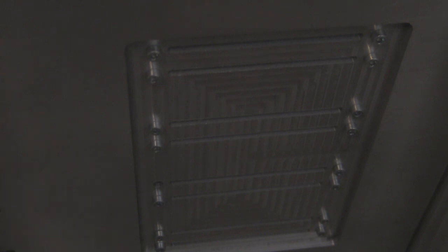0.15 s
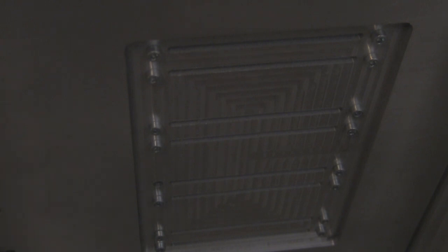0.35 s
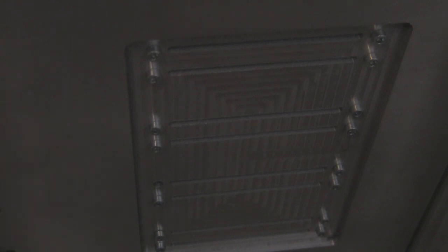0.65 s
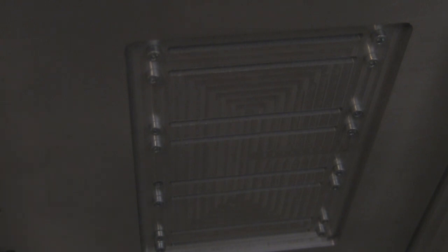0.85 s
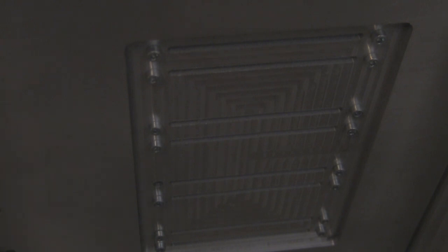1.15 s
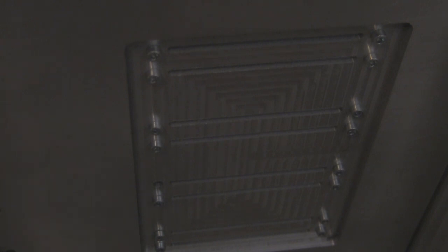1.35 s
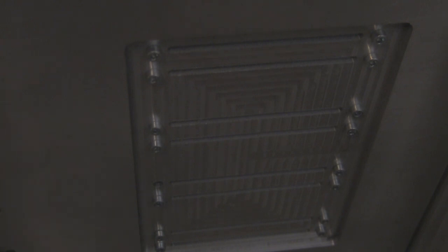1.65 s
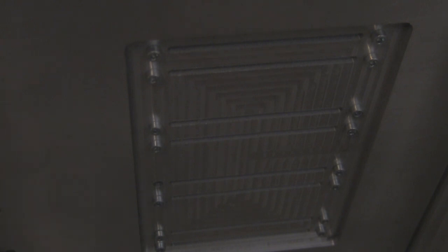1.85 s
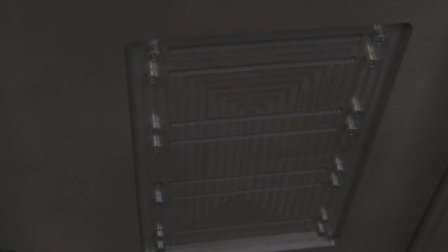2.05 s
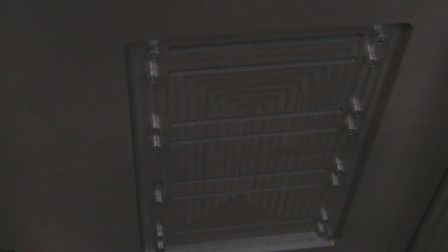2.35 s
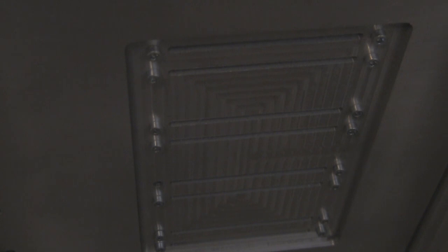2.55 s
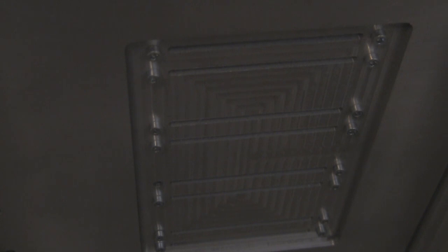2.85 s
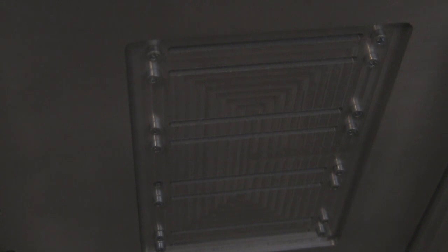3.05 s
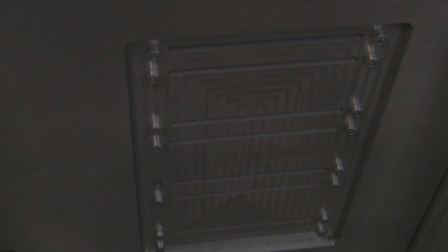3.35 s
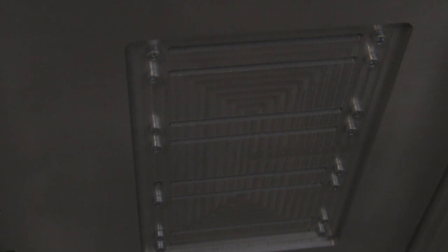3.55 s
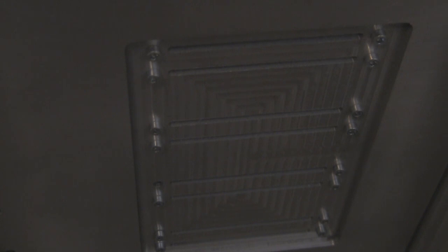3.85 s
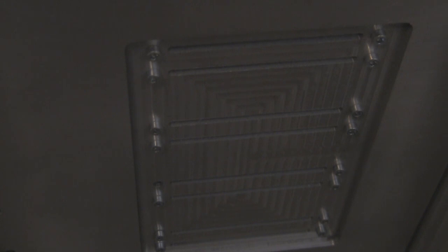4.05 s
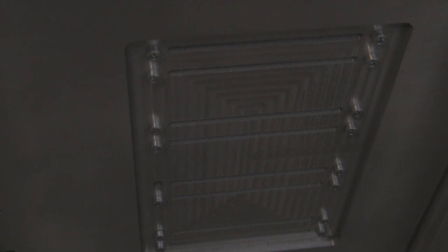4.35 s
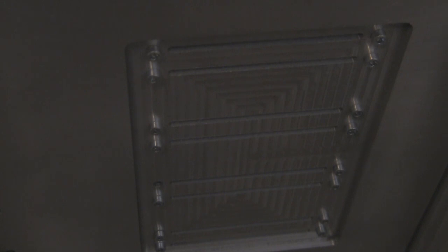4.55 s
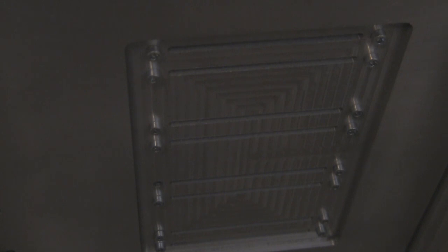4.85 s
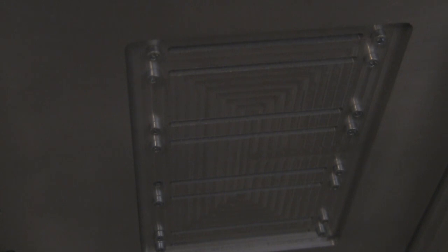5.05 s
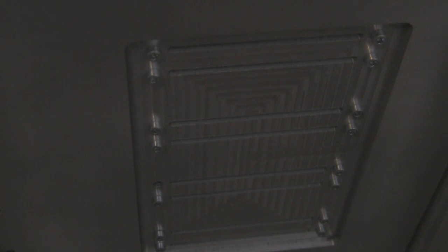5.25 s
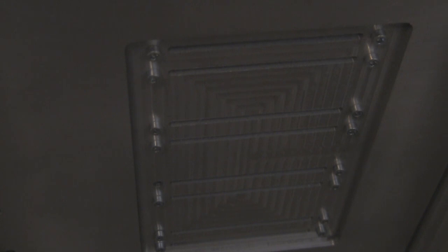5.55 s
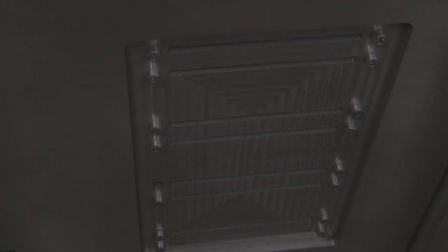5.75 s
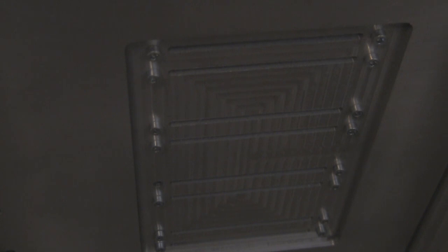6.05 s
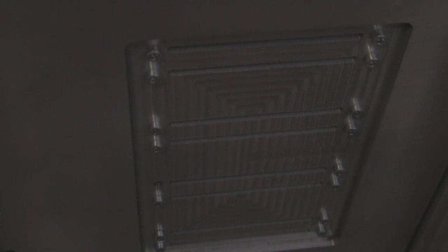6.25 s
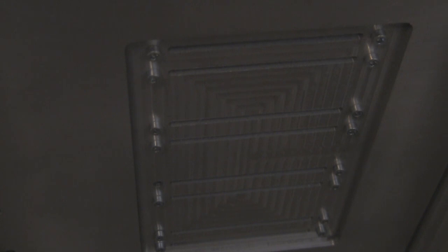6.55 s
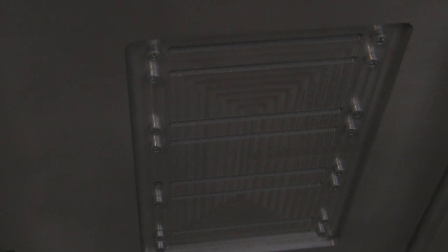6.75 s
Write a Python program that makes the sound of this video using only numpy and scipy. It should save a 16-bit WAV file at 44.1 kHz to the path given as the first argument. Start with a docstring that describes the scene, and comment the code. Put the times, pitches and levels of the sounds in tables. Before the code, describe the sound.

A metal case full of hard drives gives a steady low hum and airy whoosh, heard near in stereo with a short room echo. Desk knocks come first, then only whirring. Crisp little mouse clicks begin, followed by isolated drive croaks, which turn into fast, irregular, loud crunching and buzzing seeks, lasting until the cut.

```python
"""Hard drives and a fan hum and rush steadily in a metal case: wavering sine tones and shaped noise.
Early on come three knocks on the desk, noise through broad resonances, and two low thuds, fading sines.
Then a mouse button is pressed and released now and then: fine grit through the modes of its switch.
Soon after, drive arms make a few lone seeks, then chatter with only tiny pauses: driven body modes,
kicks, coil buzz and cover rasp. A small room answers the mouse and the drives."""
import sys
import numpy as np
from scipy import signal
from scipy.fft import rfft, irfft
from scipy.io import wavfile
from scipy.ndimage import uniform_filter1d, map_coordinates

SR = 44100
rng = np.random.default_rng(int(sys.argv[2]) if len(sys.argv) > 2 else 0)


def generate_wav(signal):
    """Clip the signal to [-1, 1] and save it as 16-bit WAV at the path in sys.argv[1]."""
    frames = np.transpose(np.atleast_2d(signal))
    scaled = np.clip(frames, -1, 1) * 32767
    pcm = np.round(scaled).astype(np.int16)
    wavfile.write(sys.argv[1], SR, pcm)


N = 305172

# All pans are left minus right, in dB.
# Fan and platter tones at multiples of the turning rate: (multiple, rms level [dB])
FAN_HZ, PLATTER_HZ = 52.66, 119.8
FAN_ORDERS = [(4, -43.5), (5, -46), (6, -66), (7, -55), (10, -53.5), (16, -70), (18, -58)]
PLATTER_ORDERS = [(1, -53), (6, -65.5), (19, -62)]
# Thin whines that fade: (pitch [Hz], rms level at the start [dB], fade [dB per s])
FADING_WHINES = [(1443, -54, 2.8), (9868, -69, 2.5), (3435, -67, 0.1)]
HUM_PAN_DB, PLATTER_EXTRA_PAN_DB = -1.3, 3

# Colour of the air rush: (frequency [Hz], relative level [dB])
AIR_SPECTRUM = [(15, -52), (25, -17), (158, -14.5), (213, -7), (278, -9), (318, -9.5), (515, -9),
                (673, -14), (1030, -10.5), (2240, -23), (2560, -22), (3440, -21.5), (6040, -29),
                (9520, -29.5), (15000, -46)]
# Case resonances heard in the rush: (frequency [Hz], width [Hz], lift [dB])
CASE_LIFTS = [(71.5, 12, 7.5), (173.4, 7.1, 12), (475, 26, 8), (836, 49, 8.5), (1034, 58, 6.5),
              (1651, 124, 9), (2164, 255, 10), (3462, 57, 10), (4380, 620, 5), (9440, 200, 3)]
# How alike left and right are in the rush: (frequency [Hz], likeness [0 to 1])
AIR_LIKENESS = [(40, 0.31), (120, 0.96), (250, 0.22), (500, 0.29), (1600, 0.72), (5000, 0.63), (9000, 0.49),
                (14000, 0.072)]
AIR_RMS_DB, AIR_PAN_DB = -39.5, -0.5

# Knocks on the desk:
# (time [s], strength [dB], rise [ms], strongest pitch [Hz], fall about it [dB per octave squared])
DESK_KNOCKS = [(0.2671, -25.5, 1.7, 2480, 1.5), (.639, -13, 14.6, 1500, -0.16), (0.751, -16, 3.9, 1110, 8)]
# Modes of desk and clutter: (frequency [Hz], width [Hz], level [dB], basic 60 dB fall time [s])
DESK_MODES = [(263, 39, -3, 0.27), (403, 164, -2, 0.28), (634, 400, -17, 0.68), (1075, 250, 1, 0.19),
              (1480, 160, -3.5, 0.19), (2080, 720, -4.5, 0.27), (2500, 790, 3.5, 0.11),
              (3520, 1000, -7, 0.3), (5470, 2000, -14.5, 0.33), (7300, 1700, -7.5, 0.19),
              (10500, 1100, -15.5, 0.16)]
# Low thuds through desk and floor: (time [s], peak level [dB], pitch [Hz], 60 dB fall time [s])
LOW_THUDS = [(0.656, -33.5, 66.7, 0.49), (2.05, -44, 70, 0.8)]

# Mouse button: (press time [s], time held [ms], press strength [dB])
MOUSE_CLICKS = [(2.7013, 101.7, -36.5), (2.958, 65, -35.5), (3.707, 98, -36.5), (4.7985, 64.8, -35.5),
                (5.4515, 68.9, -36.5), (5.7024, 58, -36.5), (6.0865, 75.4, -36.5), (6.564, 74, -35.5)]
# Switch modes: (frequency [Hz], width [Hz], level on press [dB], level on release [dB])
SWITCH_MODES = [(5560, 1250, 1.5, -11), (6260, 920, 3, -28), (7040, 660, 4.5, 3.5), (8700, 900, 5, -6),
                (9200, 420, -8.5, -23.5), (10400, 470, -15, -26)]
RELEASE_EXTRA_DB = 8
CLICK_AND_ARM_PAN_DB = 0.7

ROOM_T60_S, ROOM_DB, WALL_CUT_HZ, ROOM_PAN_DB = 0.23, -0.5, 8200, -1.2
BODY_TO_ROOM = 0.15  # the heavy case radiates its low modes little into the room

# Lone seeks and the loud ones of the chatter: (time [s], strength [dB], arm travel [ms])
LOUD_SEEKS = [(3.299, -25, 13), (3.351, -26, 10.8), (3.651, -23.5, 8.8), (4.34, -28.5, 14),
              (4.361, -24.5, 15), (4.422, -28.5, 7.2), (4.453, -27.5, 11), (4.47, -28, 7.1),
              (4.51, -25, 7.9), (4.53, -30, 18), (4.571, -34, 22), (4.653, -28, 6.4), (4.697, -27, 11.4),
              (4.894, -34, 14), (4.966, -25.5, 11.6), (5.011, -26.5, 14), (5.064, -21, 14.3),
              (5.19, -20, 15.5), (5.231, -25.5, 13), (5.272, -26, 7.6), (5.319, -29, 10.4),
              (5.384, -21.5, 15), (5.487, -22, 43), (5.627, -25, 29), (5.663, -24, 17), (5.683, -21.5, 20),
              (5.708, -23, 21), (5.797, -29, 8.8), (5.901, -24, 15), (5.921, -20, 11.2),
              (5.973, -20.5, 4.2), (6.038, -24, 10), (6.083, -30, 26), (6.131, -23.5, 12.4),
              (6.225, -21.5, 23.5), (6.253, -24, 20), (6.272, -28, 16), (6.356, -22.5, 7.9),
              (6.43, -32, 9.7), (6.452, -21, 10.3), (6.497, -24.5, 35), (6.54, -22.5, 11), (6.618, -32, 17),
              (6.639, -19.5, 9.5), (6.663, -22, 11.7), (6.728, -23, 13.6), (6.794, -23, 13),
              (6.845, -19, 10)]
# How hard seeks drive the low body modes, against their strength: (time [s], level [dB])
LOW_MODE_DRIVE = [(3.3, 1), (3.65, -3), (4.53, -3), (4.75, -7), (5.1, -19), (6.3, -14), (6.55, -14),
                  (6.9, -19)]
# Runs of small seeks: (start [s], end [s], strength [dB])
SMALL_SEEK_RUNS = [(4.33, 4.487, -42.5), (4.496, 4.934, -30.5), (5, 5.124, -29.5), (5.183, 5.844, -31),
                   (5.889, 6.406, -30.5), (6.461, 6.92, -30.5)]
# Drive body modes shaken by the arm: (frequency [Hz], width [Hz], relative level [dB])
BODY_MODES = [(157.8, 66.6, -12.5), (433.7, 59.3, -13), (493.3, 35.4, -9.5), (531.4, 28.35, -3),
              (661, 26.84, 0.5), (707, 48.6, -5), (798, 100, -11), (898, 63, -11.5), (1185, 51.9, -13.5),
              (1367, 21.2, -15.5), (1722, 195, -24.5)]
# Modes of the arm, rung by the coil buzz: (frequency [Hz], width [Hz], relative level [dB])
ARM_MODES = [(2280, 31, 1.5), (3450, 160, -5), (4200, 37, -17), (4167, 96, 2.5), (4645, 354, -5.5),
             (5110, 94, -11)]
# Modes of the cover, which rasps: (frequency [Hz], width [Hz], relative level [dB])
COVER_MODES = [(9400, 560, -3), (10140, 720, 0.5), (10800, 920, -2.5)]
SEEK_RISE_S, LOW_SCATTER_DB, SEEK_PAN_DB = 0.0054, 1.5, -2.2
SMALL_SEEKS_PER_S, RUN_RISE_S, RUN_T60_S = 260, 0.03, 0.26
BUZZ_DB, BUZZ_SCATTER_DB = -16.5, 3  # coil buzz against the seek's strength, and its chance spread
BUZZ_FOLLOWS_LOW = 0.47  # hard-driven seeks also buzz more [dB per dB]
REVERSE_RASP_DB = -29.5  # rasp as the arm reverses, against the drive of the low modes

TOP_CUT_HZ = 15100


def from_db(db):
    """Turn decibels into gain."""
    return 10 ** (np.asarray(db) / 20)


def rms_one(x):
    """Scale to an rms of 1."""
    return x / np.sqrt(np.mean(x ** 2) + 1e-20)


def at_hz(points, hz):
    """Read a curve of (Hz, value) points on a log-frequency axis."""
    point_hz, values = np.transpose(points)
    return np.interp(np.log(hz), np.log(point_hz), values)


def drift(rate):
    """Slow random wander around 0: `rate` random points a second, joined smoothly."""
    points = rng.standard_normal(600)
    coarse = np.arange(0, N + 32, 32)  # every 32nd sample is enough
    wander = map_coordinates(points, [5 + coarse / SR * rate], order=3)
    return np.interp(np.arange(N), coarse, wander)


def resonate(x, hz, width_hz):
    """A two-pole resonance that rings at one pitch, with gain 1 at its peak."""
    r = np.exp(-np.pi * width_hz / SR)
    w = 2 * np.pi * hz / SR
    gain = (1 - r * r) / 2
    return signal.lfilter([gain, 0, -gain], [1, -2 * r * np.cos(w), r * r], x + 1e-18)


def modes(x, table, skirt):
    """Side-by-side (Hz, width, dB) resonances, each followed by a wider one that steepens its flanks."""
    return sum(from_db(db) * resonate(resonate(x, hz, width), hz, skirt * width)
               for hz, width, db in table)


def swell(start_s, rise_s, hold_s, t60):
    """Loudness shape of one event: straight rise, hold, exponential fall; returns its slice and shape."""
    first = round(start_s * SR)
    length = min(N - first, round((rise_s + hold_s + t60) * SR))
    t = np.arange(length) / SR
    fall_db = -60 * np.maximum(t - rise_s - hold_s, 0) / t60
    return slice(first, first + length), np.minimum(t / rise_s, 1) * from_db(fall_db)


def pan(x, left_db):
    """Place a sound between the sides; left_db is left minus right."""
    return x * from_db([[left_db / 2], [-left_db / 2]])


def tone(hz, level_db, waver_db):
    """A sine whose level wavers slowly and whose phase differs a little between the sides."""
    phase = 2 * np.pi * (hz * np.arange(1, N + 1) / SR + rng.random())
    peak = np.sqrt(2) * from_db(level_db + waver_db * drift(5.5))
    return peak * np.sin(phase + [[0.2], [-0.2]])


def hum():
    """Turning fan and platters sound at multiples of their turning rates; thin whines fade on top."""
    fan = sum(tone(k * FAN_HZ, db, waver_db=0.4) for k, db in FAN_ORDERS)
    platters = sum(tone(k * PLATTER_HZ, db, waver_db=0.5) for k, db in PLATTER_ORDERS)
    t = np.arange(N) / SR
    whines = sum(tone(hz, db - fade_db * t, waver_db=3.0) for hz, db, fade_db in FADING_WHINES)
    return fan + pan(platters, PLATTER_EXTRA_PAN_DB) + whines


def air():
    """Fan and platters stir the air into a stereo rush of noise, lifted at the case resonances."""
    hz = np.maximum(np.fft.rfftfreq(N, 1 / SR), 1)
    lift_db = sum(db / (1 + (2 * (hz - f) / width) ** 2) for f, width, db in CASE_LIFTS)
    colour = from_db(at_hz(AIR_SPECTRUM, hz) + lift_db)
    mid, side = rfft(rng.standard_normal((2, N))) * colour
    alike = np.clip(at_hz(AIR_LIKENESS, hz), 0, 1)
    rush = irfft(np.sqrt(1 + alike) * mid + np.sqrt(1 - alike) * side * [[1], [-1]], N)
    return pan(from_db(AIR_RMS_DB + 0.5 * drift(9)) * rms_one(rush), AIR_PAN_DB)


def knocks():
    """Each knock shakes desk and clutter: noise in broad resonances, each dying at its own rate."""
    out = np.zeros((2, N))
    for hz, width, mode_db, t60 in DESK_MODES:
        common, own = rng.standard_normal((2, SR))
        noise = common + 0.15 * own * [[1], [-1]]
        rattle = rms_one(modes(noise, [(hz, width, 0)], skirt=5.2))
        for s, db, rise_ms, top_hz, fall_db in DESK_KNOCKS:
            knock_t60 = t60 * from_db(0.59 * (db + 17.5))  # light knocks die sooner
            at, shape = swell(s, rise_ms / 1000, 0, knock_t60)
            colour_db = mode_db - fall_db * np.log2(hz / top_hz) ** 2
            out[:, at] += from_db(db + colour_db - 10) * shape * rattle[:, :len(shape)]
    return out


def thuds():
    """A low mode swells and dies."""
    out = np.zeros(N)
    for s, db, hz, t60 in LOW_THUDS:
        at, shape = swell(s, 0.025, 0, t60)
        t = np.arange(len(shape)) / SR
        out[at] += from_db(db) * shape * np.sin(2 * np.pi * hz * t)
    return out


def mouse():
    """The switch snaps in some ms of fine clicks; press and release weight its modes differently."""
    out, grit = np.zeros(N), rng.standard_normal(N)
    snap = np.hanning(round(0.024 * SR))
    presses = [(s, db) for s, held_ms, db in MOUSE_CLICKS]
    releases = [(s + held_ms / 1000, db + RELEASE_EXTRA_DB) for s, held_ms, db in MOUSE_CLICKS]
    for column, snaps in enumerate((presses, releases)):
        force = np.zeros(N)
        for s, db in snaps:
            first = round((s - 0.007) * SR)
            force[first:first + len(snap)] += from_db(db) * snap
            at, shape = swell(s, 0.027, 0, 0.15)  # the shell buzzes on faintly
            force[at] += from_db(db - 22) * shape
        table = [(hz, width, levels[column]) for hz, width, *levels in SWITCH_MODES]
        out += modes(force * grit, table, skirt=1.45)
    return out


def room(x):
    """Walls send back dull, dying reflections, mostly shared by the two sides."""
    t = np.arange(SR // 2) / SR
    fading = from_db(-60 * t / ROOM_T60_S) * (t > 0.004)  # nothing returns in the first 4 ms
    common, own = rng.standard_normal((2, len(t))) * fading
    dull = signal.butter(1, WALL_CUT_HZ, fs=SR, output="sos")
    tail = signal.sosfilt(dull, common + 0.48 * own * [[1], [-1]])
    tail = tail / np.sqrt(np.sum(tail ** 2, axis=1)[:, None])
    return from_db(ROOM_DB) * signal.fftconvolve(x[None], tail, axes=1)[:, :N]


def seeks():
    """A travelling arm drives the body modes, then the servo damps them; start, reversal and stop
    kick the body, the coil buzz rings the arm and the cover rasps. Returns body and treble."""
    upper, lower, buzz, kicks, fill, reverse = np.zeros((6, N))
    drive_s, drive_db = np.transpose(LOW_MODE_DRIVE)
    for s, db, travel_ms in LOUD_SEEKS:
        travel_s = travel_ms / 1000
        low_db = np.interp(s, drive_s, drive_db) + LOW_SCATTER_DB * rng.standard_normal()
        buzz_db = BUZZ_DB + BUZZ_FOLLOWS_LOW * low_db + BUZZ_SCATTER_DB * rng.standard_normal()
        at, shape = swell(s - 0.002, SEEK_RISE_S, max(travel_s - SEEK_RISE_S / 2, 0), 0.03)
        upper[at] += from_db(db) * shape
        lower[at] += from_db(db + low_db) * shape
        buzz[at] += from_db(db + buzz_db) * shape
        # push off, reverse, stop
        turns = at.start + np.round(np.array([0.1, 0.5, 1]) * travel_s * SR).astype(int)
        kicks[turns] += from_db(db + low_db / 2 + 25) * np.array([0.8, -1.1, 0.7])
        rasp_gain = from_db(db + low_db + REVERSE_RASP_DB)
        reverse[turns[1]:turns[1] + 350] += rasp_gain * np.hanning(350)  # 8 ms
    for start_s, end_s, db in SMALL_SEEK_RUNS:
        at, shape = swell(start_s, RUN_RISE_S, end_s - start_s - RUN_RISE_S, RUN_T60_S)
        fill[at] += from_db(db) * shape

    body, t = np.zeros(N), np.arange(N) / SR
    for hz, width, mode_db in BODY_MODES:
        if hz < 600:
            drive = lower
        elif hz < 760:
            drive = upper
        else:
            drive = (lower + upper / 2) / 2
        # each mode keeps ringing near its pitch, its phase wandering at random, more for wider modes; the force
        # sets its level
        wander = np.cumsum(0.4 * width * drift(40)) / SR
        ringing = np.sin(2 * np.pi * (hz * t + wander + rng.random()))
        body += from_db(mode_db - 3.5) * (drive + 0.96 * fill) * ringing
    small = (rng.random(N) < SMALL_SEEKS_PER_S / SR) * rng.uniform(-0.99, 1, N)
    body += 0.77 * fill * rms_one(modes(small, BODY_MODES, skirt=2.9))
    # the coil current takes time to rise, so the kicks are softened
    soft = signal.butter(2, [130, 2500], "band", fs=SR, output="sos")
    kick_modes = [(hz, 5.7 * width, db / 2) for hz, width, db in BODY_MODES]
    body += modes(signal.sosfilt(soft, kicks), kick_modes, skirt=3.0)

    sparse_noise = rng.standard_normal(N) * (rng.random(N) < 0.03)
    arm = modes(sparse_noise * (buzz + from_db(-12) * fill), ARM_MODES, skirt=9.8)
    steps = uniform_filter1d(np.abs(np.sign(small)), size=110)  # each small step rasps for 2.5 ms
    rasp = (steps + 0.009) * rng.standard_normal(N)
    ticks = rasp * (fill + upper / 4) + reverse * rng.standard_normal(N)
    cover = modes(ticks, COVER_MODES, skirt=3.3)
    return body, from_db(27.5) * arm + from_db(18.5) * cover


def scene():
    """Steady hum and rush, knocks and thuds; mouse and drives are heard directly and through the room."""
    steady = pan(hum(), HUM_PAN_DB) + air()
    desk = knocks() + thuds()
    button = mouse()
    body, treble = seeks()
    near = pan(body, SEEK_PAN_DB) + pan(treble + button, CLICK_AND_ARM_PAN_DB)
    echoes = room(BODY_TO_ROOM * body + treble / 2 + 0.65 * button)
    return steady + desk + near + pan(echoes, ROOM_PAN_DB)


def record(dry):
    """A steep low-pass cuts off the very top."""
    return signal.sosfilt(signal.ellip(10, 0.5, 70, TOP_CUT_HZ, fs=SR, output="sos"), dry)


dry = scene()
out = record(dry)
generate_wav(out)
```